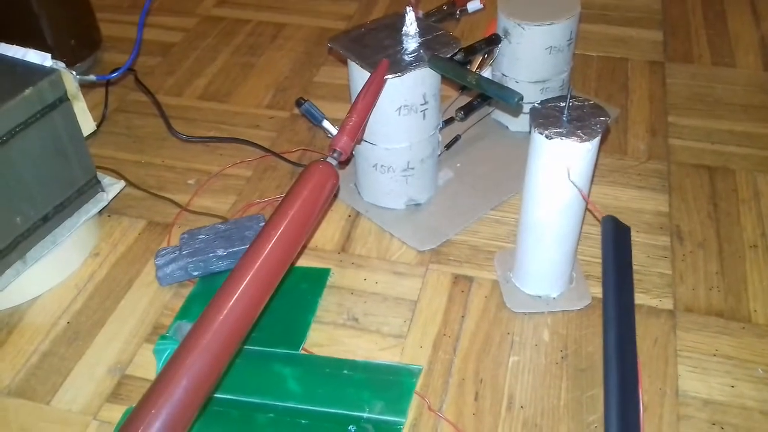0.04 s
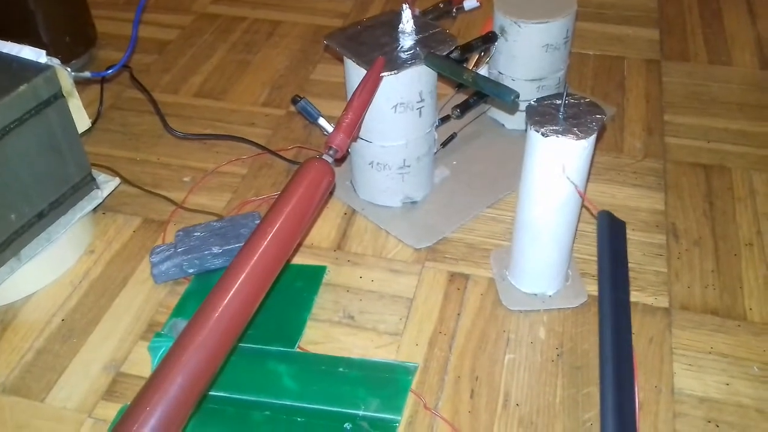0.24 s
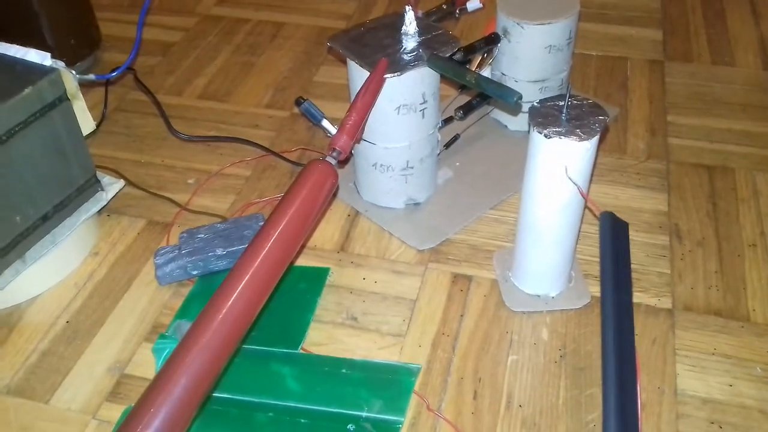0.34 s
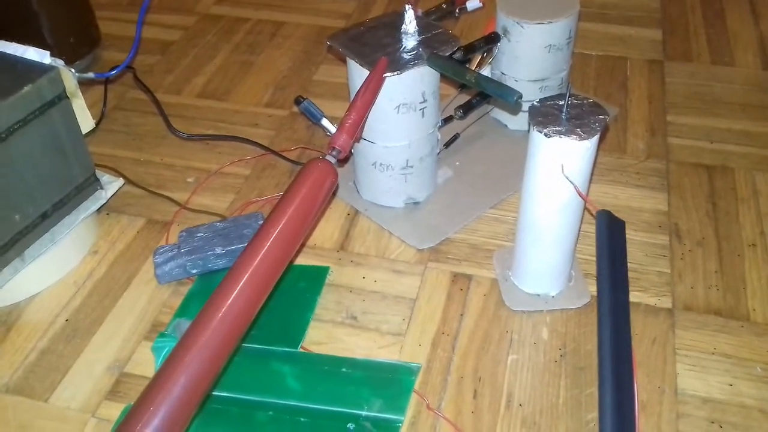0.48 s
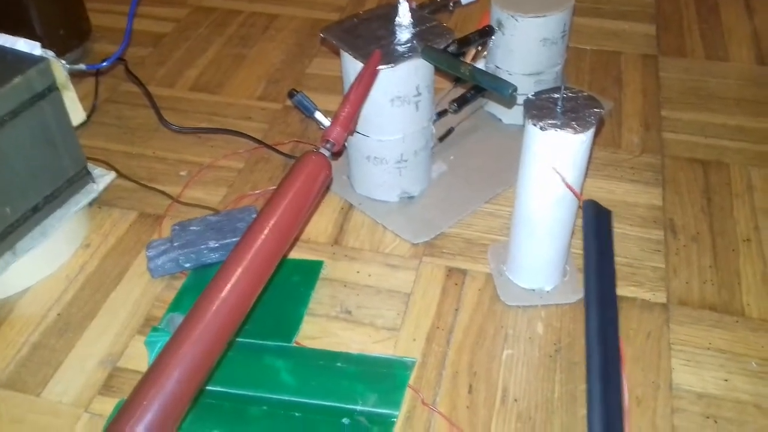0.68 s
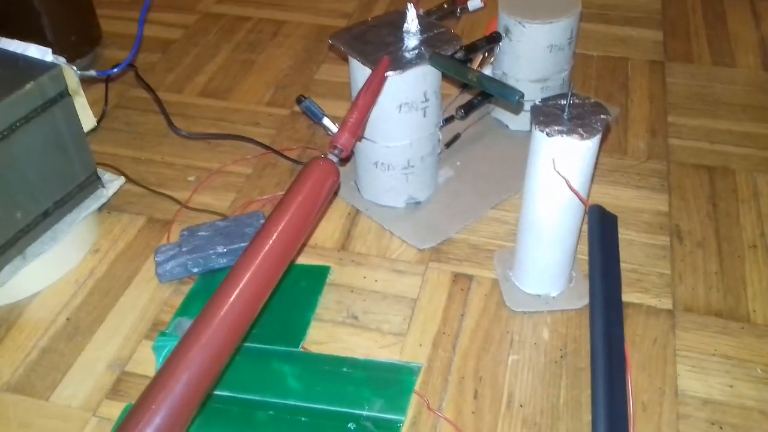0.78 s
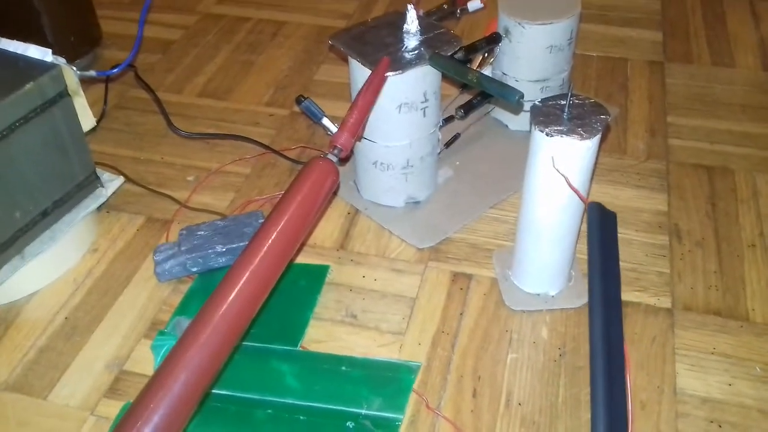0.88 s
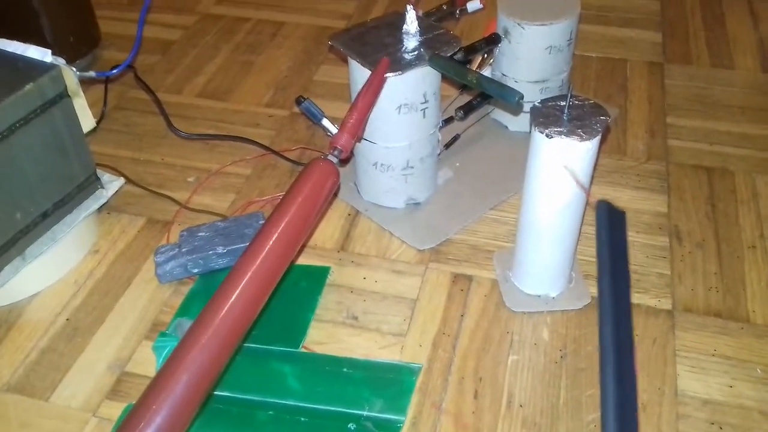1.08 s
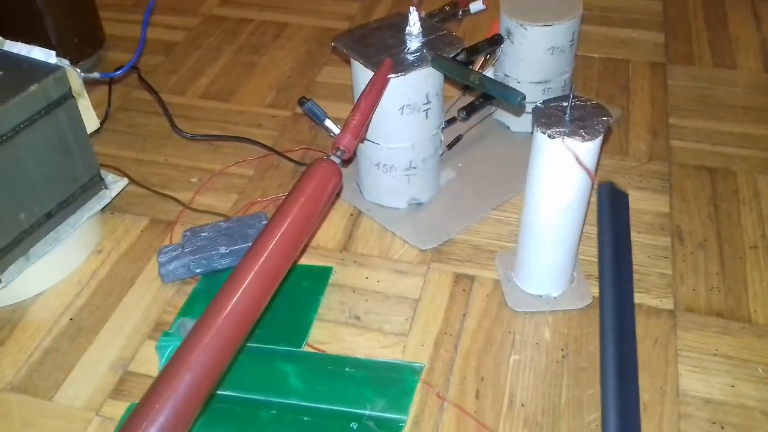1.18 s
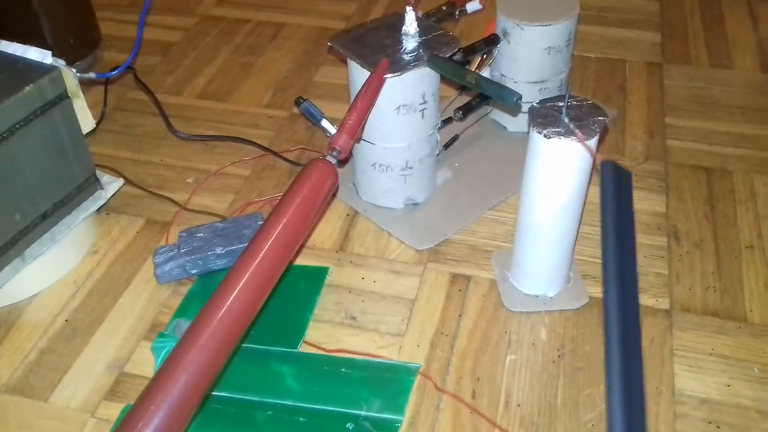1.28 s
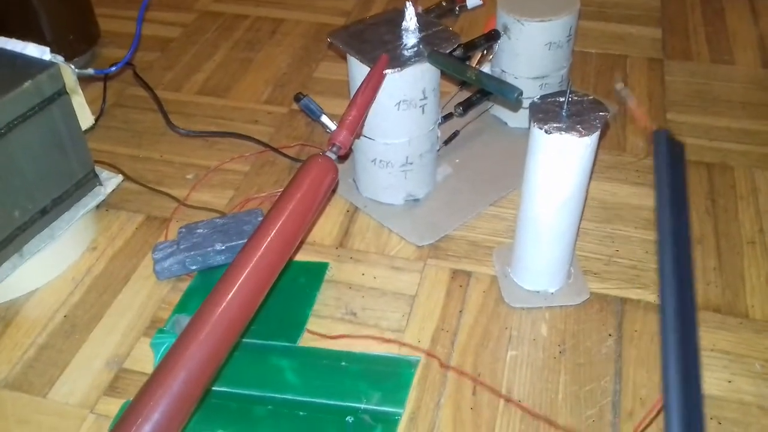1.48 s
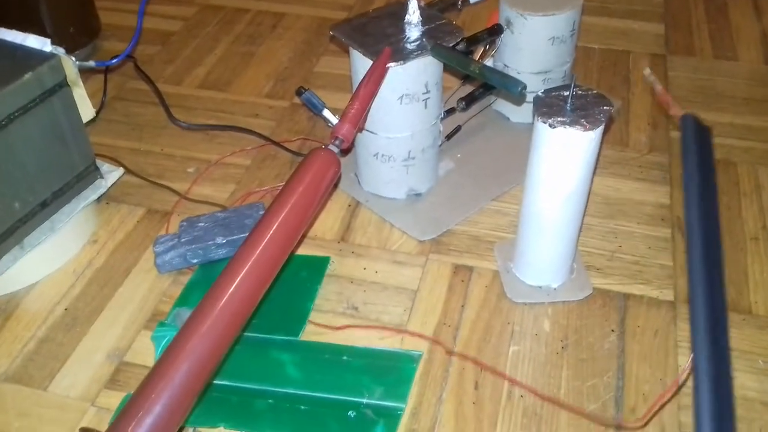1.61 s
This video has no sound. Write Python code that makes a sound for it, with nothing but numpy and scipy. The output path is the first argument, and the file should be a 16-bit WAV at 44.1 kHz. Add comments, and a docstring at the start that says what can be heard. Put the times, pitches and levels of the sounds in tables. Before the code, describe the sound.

High-voltage sparks snap after a brief sizzle, one loud crack then a quickening run.

```python
"""A room with a wooden floor, a homemade high-voltage rig standing on it. Over faint hiss and hum,
corona sizzles and spits ever harder until a big spark jumps. A run of smaller snaps follows, mostly
in step with the mains, then two faint ticks. Each spark is one pressure spike that rings briefly
in the microphone, echoes off nearby things and fills the room."""
import numpy as np
from scipy import signal
from scipy.fft import rfft, irfft, next_fast_len
from scipy.io import wavfile
from scipy.ndimage import uniform_filter1d
import sys
import numpy as np
from scipy import signal
from scipy.fft import rfft, irfft, next_fast_len
from scipy.io import wavfile
from scipy.ndimage import uniform_filter1d

SR = 44100
rng = np.random.default_rng(int(sys.argv[2]) if len(sys.argv) > 2 else 0)


def master_out(mix):
    """Clip the mix to full scale and print it as 16-bit PCM to the path in sys.argv[1]."""
    frames = np.transpose(np.atleast_2d(mix))
    ceiling = np.clip(frames, -1, 1)
    pcm = np.round(ceiling * 32767).astype(np.int16)
    wavfile.write(sys.argv[1], SR, pcm)


N = 72765
SIZE = next_fast_len(2 * N)
HZ = np.arange(SIZE // 2 + 1) * SR / SIZE
TIME = np.arange(N) / SR


def from_db(db):
    """Decibels to gain."""
    return 10 ** (np.asarray(db) / 20)


def rms_one(x):
    """Scale to rms 1."""
    return x / np.sqrt(np.mean(x ** 2) + 1e-20)


def at_hz(points, hz):
    """Read a table on a log-frequency axis."""
    f, value = np.transpose(points)
    return np.interp(np.log(hz + 1), np.log(f), value)


def fader(points):
    """Gain over time from rows of t/s, level/dB."""
    return from_db(np.interp(TIME, *np.transpose(points)))


def colour(x, points):
    """Minimum-phase EQ from rows of f/Hz, level/dB: it rings only after the attack."""
    cepstrum = irfft(np.log(from_db(at_hz(points, HZ))), SIZE)
    cepstrum[1:SIZE // 2] *= 2
    cepstrum[SIZE // 2 + 1:] = 0
    return irfft(rfft(x, SIZE) * np.exp(rfft(cepstrum)), SIZE)[:N]


def delay(s):
    """Spectrum of a unit spike at a given time."""
    return np.exp(-2j * np.pi * HZ * s)


def echo(ms, gain):
    """Spectrum of one reflection."""
    return gain * delay(ms / 1000)


def background():
    """A bed of faint hiss and transformer hum, sinking once the sparks begin."""
    # tone of the hiss: f/Hz, level/dB
    hiss_eq = [(30, -6.5), (100, -6.5), (200, 0.5), (400, -2.5), (1000, -6), (2000, -9.5), (5000, -6),
               (15000, -29)]
    # fade of the whole bed: t/s, level/dB
    bed_fade = [(0, -2), (.23, -1), (.3, -4), (.6, -14), (.8, -13.5), (1.25, -17), (1.65, -18.5)]
    hum_hz = 200
    hiss = from_db(-61) * rms_one(colour(rng.standard_normal(N), hiss_eq))
    hum = from_db(-71.5) * rms_one(np.sin(2 * np.pi * hum_hz * TIME))
    return fader(bed_fade) * (hiss + hum)


def corona():
    """Dense random micro-discharges sizzle on the charged foil."""
    # rise and fall of the sizzle: t/s, level/dB
    sizzle_fade = [(0, -53.5), (.12, -51.5), (.23, -56), (.26, -54), (.52, -53), (.6, -64.5), (.68, -66.5),
                   (1.3, -77), (1.45, -70.5), (1.65, -74.5)]
    # tone of the sizzle: f/Hz, level/dB
    sizzle_eq = [(1000, -49), (2400, -33), (3000, -11), (3500, -2), (4500, 5), (5100, -1), (6200, -10.5),
                 (7200, -25.5), (8200, -24.5), (9800, -32), (11500, -22.5), (15500, -25)]
    clicks_per_s, spread_db = 4000, 3.5
    fires = rng.random(N) < clicks_per_s / SR
    sizes = from_db(spread_db * np.minimum(rng.exponential(1, N), 5))
    polarity = rng.choice([-1, 1], N)
    return fader(sizzle_fade) * rms_one(colour(fires * sizes * polarity, sizzle_eq))


def streamers():
    """Each spit is a nearly regular run of tiny discharges, which gives it a brief pitch."""
    # spits: t/s (negative wraps to the end), length/s, strength/dB
    spits = [(-0.0054, .001, -47), (0.102, .001, -32.5), (0.141, .003, -32.5), (.1495, .001, -32.5),
             (0.157, 0.0044, -20.5), (0.168, .002, -29.5), (0.1717, .004, -20), (0.176, .004, -22.5),
             (.182, .002, -29), (0.189, .009, -22), (0.2013, .003, -9), (.206, .005, -17),
             (0.2213, .0025, -11.5), (0.224, 0.0048, -23), (0.34, .006, -18.5)]
    # tone of a spit, thinner than a spark: f/Hz, level/dB
    spit_eq = [(2700, -10.5), (3600, 0), (5500, 2), (8300, 2), (11300, 0.5), (15000, -1.5)]
    rate_hz, jitter_periods, max_spikes = 2800, .11, 64
    out = np.zeros(N)
    for s, length, db in spits:
        jitter, scatter = rng.standard_normal((2, max_spikes))
        count = int(np.clip(length * rate_hz, 2, max_spikes))
        when = s + (np.arange(count) + jitter_periods * jitter[:count]) / rate_hz
        sizes = from_db(3 * scatter[:count])
        out[(when * SR).astype(int)] -= from_db(db) * sizes / np.linalg.norm(sizes)
    return colour(out, spit_eq)


def sparks():
    """One pressure spike per spark; its nearest echo and brightness shift as the electrode moves."""
    # spark hits: t/s, strength/dB, nearest echo delay/ms, signed echo gain, loss at treble_hz/dB
    hits = [(0.2425, 16.5, 0.42, -0.15, 4), (0.3617, 9.5, 0.43, -0.13, 0), (.6828, 5, 0.41, -0.29, 8),
            (0.742, 4, .42, -0.36, 2.5), (.8023, 3, 0.41, -0.28, 2.5), (0.8427, 1.8, .42, -0.2, 0),
            (0.8838, 1.54, .42, -0.31, 0), (.9222, 2.1, 0.41, -0.2, -2), (0.9243, -2.5, 0.44, -.38, 2.5),
            (.9625, -0.1, 0.425, -0.28, -1), (0.9848, -0.1, 0.44, -0.13, -2),
            (1.0218, 0.1, 0.42, -0.31, -0.5), (1.0426, -2, 0.462, -0.3, -3.5),
            (1.0627, 1.3, 0.42, -0.21, 2), (1.0824, -2.7, 0.48, -0.35, -2.5),
            (1.104, 1.1, 0.45, -0.22, -0.5), (1.1247, -1.5, .45, -0.17, -1.5),
            (1.162, -0.5, 0.4, 0.17, 0.5), (1.1823, 0, 0.48, -0.39, 3.5), (1.222, 2, 0.308, -0.13, 4.5)]
    treble_hz = 12000
    spectrum = 0
    for s, db, echo_ms, echo_gain, loss_db in hits:
        spike = from_db(db - loss_db * (HZ / treble_hz) ** 2) * delay(s)
        spectrum += spike * (1 + echo(echo_ms, echo_gain))
    band_limit = 1 - (2 * HZ / SR) ** 20
    return -irfft(spectrum * band_limit, SIZE)[:N]


def near_field(spikes):
    """The close snap: direct sound and early reflections, ringing briefly in the microphone."""
    # reflections off the rig, floor and furniture: delay/ms, signed gain
    reflections = [(.363, 0.43), (1.196, 0.16), (1.687, 0.04), (2.532, 0.19), (3.3, 0.017), (9.0, 0.049),
                   (10.4, 0.027), (18.5, 0.079)]
    # tone of a snap at the microphone: f/Hz, level/dB
    snap_eq = [(200, -32), (1200, -36), (1500, -12.5), (2000, -12.5), (2600, -3), (3200, -3.5),
               (3900, 15.5), (5400, 13), (6100, 3), (6800, -1.5), (8000, -3.5), (9700, -11), (11200, -4),
               (13500, -11), (15500, -15.5)]
    paths = 1 + sum(echo(ms, gain) for ms, gain in reflections)
    arrivals = irfft(rfft(spikes, SIZE) * paths, SIZE)[:N]
    return colour(arrivals, snap_eq)


def room(spikes):
    """Reflections, sparse at first, thicken into a short bright tail whose lows die soonest."""
    # tone of the reverb: f/Hz, level/dB
    reverb_eq = [(200, -43), (600, -30.5), (1200, -29), (2000, -18), (3000, -12), (3700, -3.5), (4200, 5),
                 (5200, -2), (6200, -10), (8000, -17.5), (9900, -27), (11200, -17.5), (15500, -28.5)]
    # decay of the reverb: f/Hz, t60/s
    decay_times = [(500, 0.14), (2000, .38), (4300, 0.35), (8000, 0.32), (14000, 0.34)]
    return_db, build_s, grain_db, grain_s = 1, 0.0081, 8.5, 0.048
    grain = from_db(grain_db * np.exp(-TIME / grain_s) * rng.standard_normal(N))
    grain /= np.sqrt(uniform_filter1d(grain ** 2, size=400))  # rough texture at an even power
    noise = rfft(grain * rng.standard_normal(N), SIZE)
    edges_hz = np.geomspace(60, SR / 2, 13)
    tail = np.zeros(N)
    for low, high in zip(edges_hz, edges_hz[1:]):
        band = irfft(noise * ((HZ >= low) & (HZ < high)), SIZE)[:N]
        t60 = at_hz(decay_times, np.sqrt(low * high))
        tail += band * np.exp(-np.log(1000) * TIME / t60)
    tail *= 1 - np.exp(-TIME / build_s)
    wet = signal.fftconvolve(spikes, tail / np.linalg.norm(tail))[:N]
    return from_db(return_db) * colour(wet, reverb_eq)


def ticks():
    """Faint dull ticks as the electrode is pulled away."""
    # clicks, the first three merging into one tick: t/s, strength/dB
    clicks = [(1.497, -40), (1.4973, -37), (1.4987, -34.5), (1.518, -41)]
    # tone of a tick: f/Hz, level/dB
    tick_eq = [(1500, -33), (2700, -1), (4300, 18), (5400, 11), (7000, -17), (12000, -28)]
    out = np.zeros(N)
    for s, db in clicks:
        out[int(s * SR)] += from_db(db)
    return colour(out, tick_eq)


def scene():
    """The mix: spits and sparks, close up and in the room, with ticks, corona and the bed."""
    spit_send_db = -8.5
    spits, snaps = streamers(), sparks()
    close = near_field(snaps + spits)
    reverb = room(snaps + from_db(spit_send_db) * spits)
    return (close + reverb + ticks() + corona() + background())[None]


def record(dry):
    """Loud snaps overload the microphone, which recovers with a low thump; lows and highs are cut."""
    # the recorder's treble roll-off: f/Hz, level/dB
    treble_eq = [(10500, 0), (13000, -1.5), (15500, -5)]
    oversample, ceiling, knee, bias = 4, .82, 12, .04
    thump_db, thump_hz = -24, 162
    low_cut_hz, high_cut_hz = 29, 16000
    fine = signal.resample_poly(dry, oversample, 1, axis=-1)
    limit = ceiling * (1 + bias * np.sign(fine))  # lopsided: the negative side clips first
    clipped = fine / (1 + np.abs(fine / limit) ** knee) ** (1 / knee)
    recovery = signal.butter(2, thump_hz, fs=oversample * SR, output="sos")
    thump = from_db(thump_db) * signal.sosfilt(recovery, np.abs(fine - clipped))
    out = signal.resample_poly(clipped + thump, 1, oversample, axis=-1)
    out = signal.sosfilt(signal.butter(1, low_cut_hz, "high", fs=SR, output="sos"), out)
    out = colour(out[0], treble_eq)[None]
    return signal.sosfiltfilt(signal.butter(12, high_cut_hz, fs=SR, output="sos"), out)


dry = scene()
out = record(dry)
master_out(out)
```